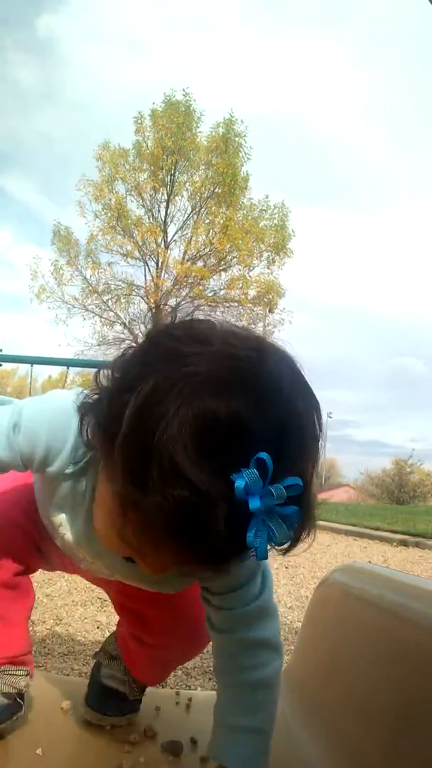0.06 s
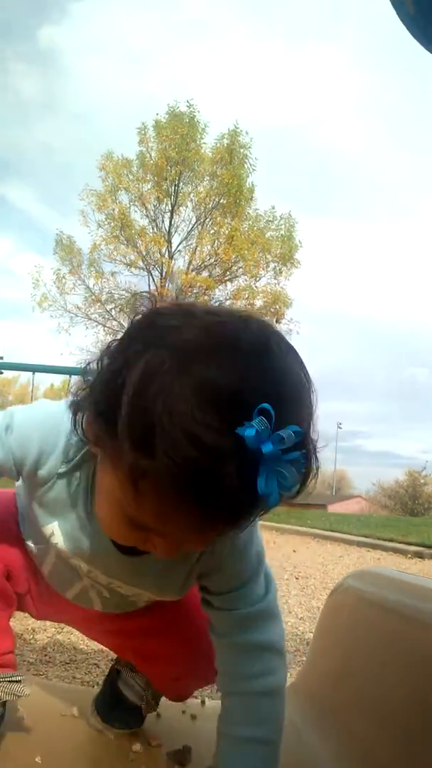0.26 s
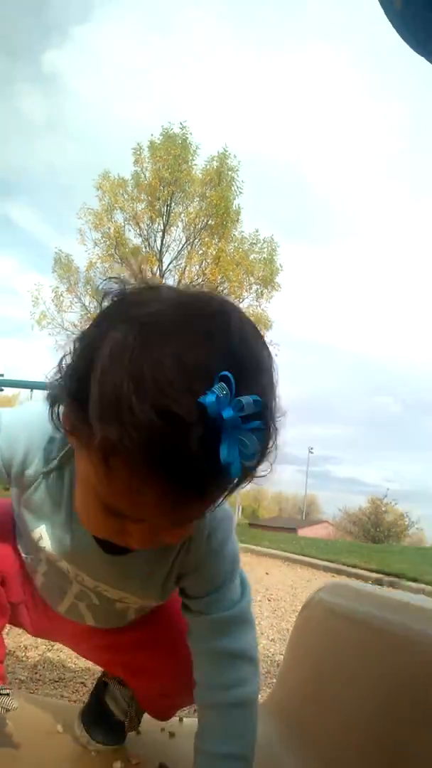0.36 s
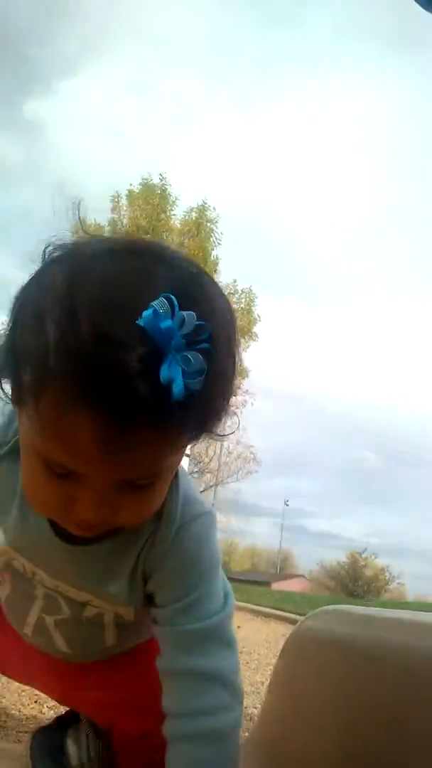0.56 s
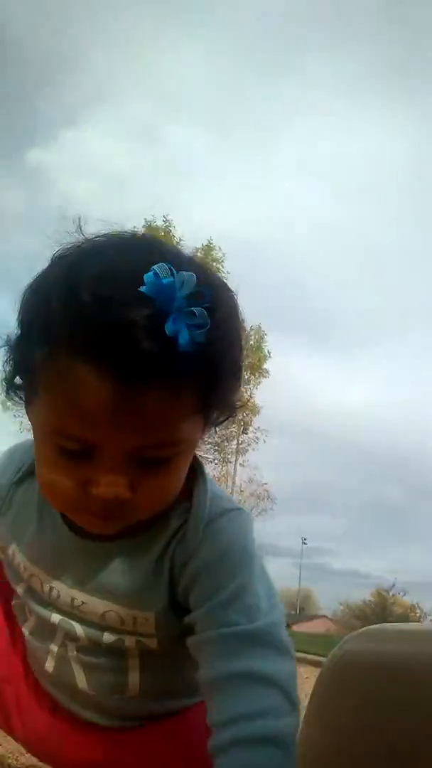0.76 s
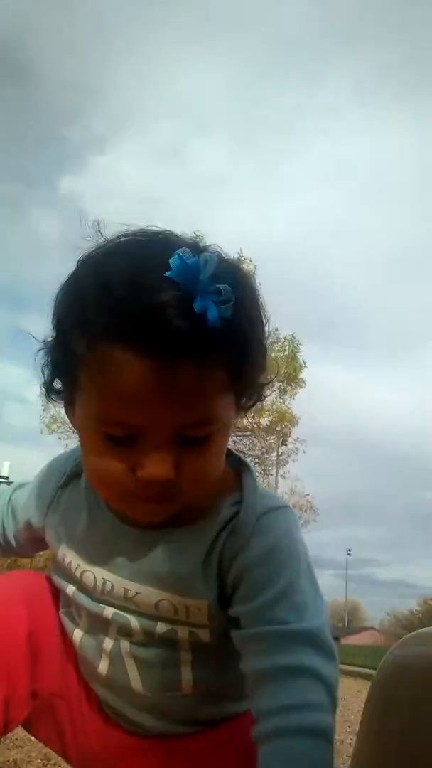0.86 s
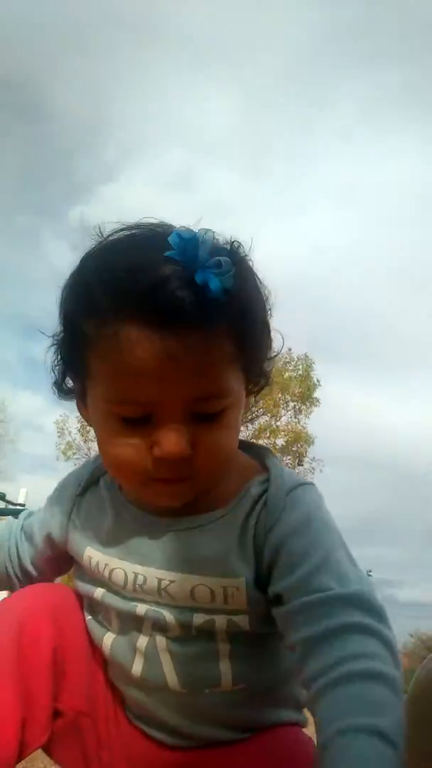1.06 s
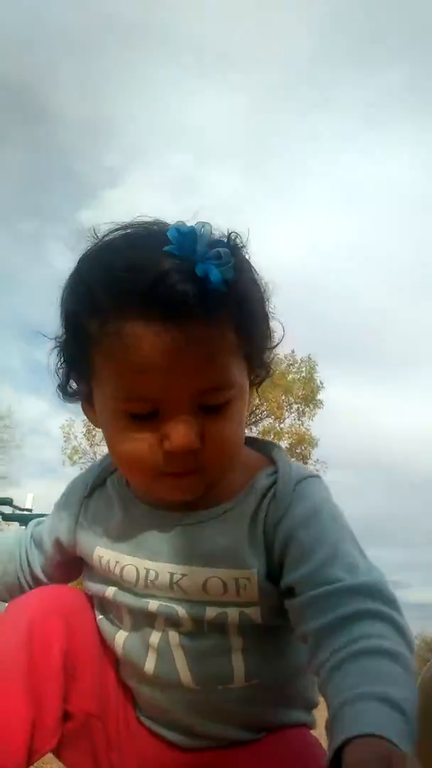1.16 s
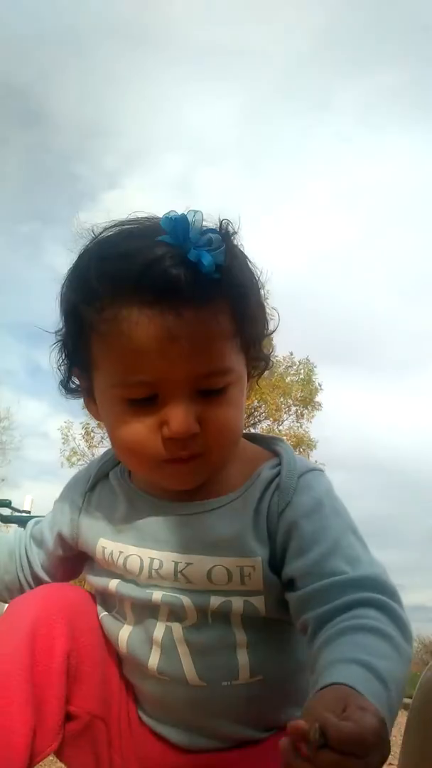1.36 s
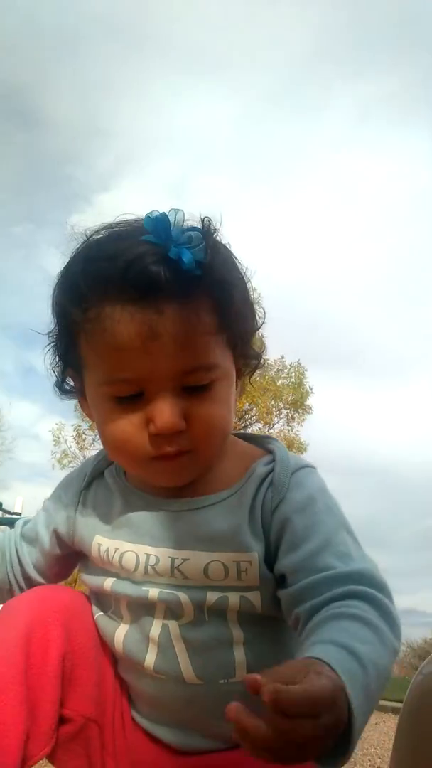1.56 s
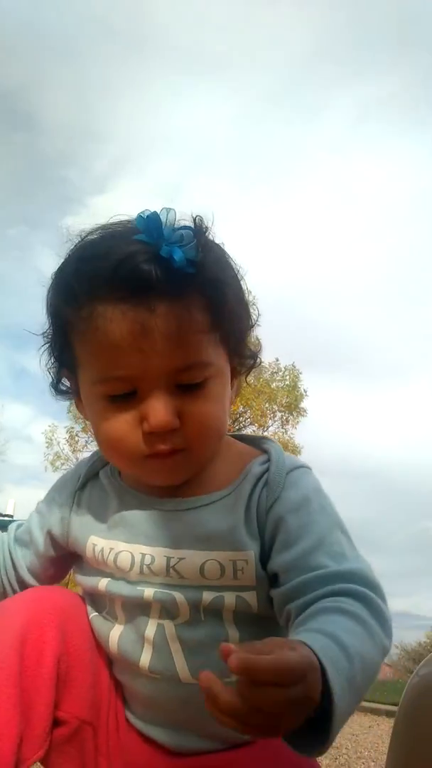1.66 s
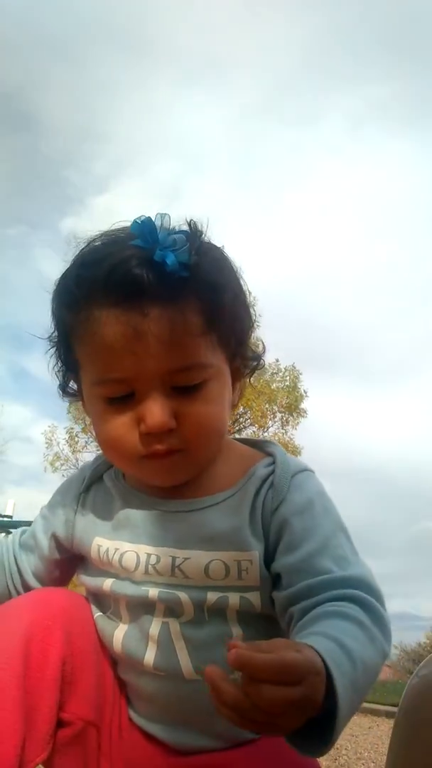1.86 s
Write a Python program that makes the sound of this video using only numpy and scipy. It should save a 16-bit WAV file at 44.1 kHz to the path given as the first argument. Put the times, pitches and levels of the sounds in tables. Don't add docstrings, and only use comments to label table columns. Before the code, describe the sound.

Small pebbles crunch, scrape and knock on a hollow plastic playground slide, then tick to rest

```python
import sys
import numpy as np
from scipy import signal
from scipy.fft import rfft, irfft
from scipy.io import wavfile

SR = 44100
rng = np.random.default_rng(int(sys.argv[2]) if len(sys.argv) > 2 else 0)


def wav_out(sig):
    wavfile.write(sys.argv[1], SR, np.round(np.clip(np.atleast_2d(sig).T, -1, 1) * 32767).astype(np.int16))


def volts(x):
    e = np.asarray(x, float) / 20
    return 10 ** e


N = 83790

# (time [s], shell level from its pressure [dB], grit level [dB], centre of the shell's ring [Hz])
HAND_DRAG = [(0, -44, -42, 465), (.12, -63, -47.5, 390), (.21, -36, -41, 328), (.27, -25.5, -32.5, 460),
             (.36, -18, -30, 575), (.52, -22.5, -34, 632), (.6, -22.5, -32, 440), (.8, -27.5, -36, 338),
             (.97, -31.5, -36, 354), (1.09, -41, -43.5, 340), (1.14, -49, -61.5, 292),
             (1.3, -67, -53.5, 288), (1.41, -66, -57, 250), (1.466, -68, -56, 250),
             (1.474, -34, -48.5, 270), (1.605, -33.5, -43, 274), (1.63, -42.5, -66, 302),
             (1.9, -74.5, -66, 300)]
# (time [s], peak level [dB], ring [Hz])
STONE_LURCHES = [(0.252, -14, 380), (0.261, -10, 420), (0.315, -13, 650), (0.353, -4, 577),
                 (0.368, -4.5, 565), (0.423, -10, 640), (0.428, -5, 700), (0.467, -11, 575),
                 (0.489, -6.5, 637), (0.51, -13, 600), (0.626, -17.5, 415), (0.689, -31, 386),
                 (0.707, -32, 455), (1.474, -20.5, 348), (1.497, -23, 306), (1.514, -32, 258),
                 (1.543, -21.5, 356), (1.567, -26, 308), (1.586, -28, 403), (0.541, -26, 564),
                 (0.959, -15, 335)]
# (frequency [Hz], level [dB])
GRIT_COLOUR = [(200, 26.5), (700, 18), (1600, 7), (2800, 8.5), (4200, -5.5), (7500, -0.5), (10500, -8),
               (16000, -26)]
# (frequency [Hz], width [Hz], level [dB])
GRIT_RESONANCES = [(3540, 550, 5.5), (5030, 1610, 11), (9200, 1350, 7.5), (11870, 2700, 17),
                   (14420, 2100, 23)]
# (time [s], peak level [dB], shell part [dB], bright part [dB])
HAND_CRACKS = [(0.015, -27.5, 1, 15.5), (0.0342, -26.5, 3.5, 12.5), (0.0595, -19.5, -6.5, 1),
               (0.0955, -29, 10, 14), (0.1125, -33, -8, 7), (0.137, -43, -10, 14), (0.3056, -9, -14, -17),
               (0.3318, -1.5, -26, -21), (0.3544, -10, 3, -12), (0.3708, -19, -12, -14),
               (0.4268, -11.5, 1.5, 6), (0.4414, -20, -9, 2), (0.4674, -22, -14, 9),
               (0.4894, -11.5, 6, 6.5), (0.5114, -16, 11, 9.5), (0.7082, -4.5, -5, -6),
               (0.7547, -15, -4, 9), (0.7619, -3.5, -10, 6), (0.785, -25.5, 10, 10), (0.8768, -3, -1, -10),
               (0.9246, -13.5, -5, 10.5), (0.9274, -3, -2, -6), (0.9332, -29, -6, 9),
               (0.9574, -10.5, -4, 7), (0.973, -14.5, -2, -22), (0.9872, -21, -1, 12),
               (0.9903, -14, -10.5, 16.5)]
# (time [s], peak level [dB], shell part [dB], bright part [dB])
LOOSE_TICKS = [(1.1477, -27, 0, -12), (1.1546, -23, -1.5, -24), (1.1766, -27, 2, -20),
               (1.1943, -21.5, -5, -1), (1.2008, -24.5, -1.5, 15.5), (1.2144, -28.5, -0.5, -8),
               (1.2488, -35, 5.5, 14.5), (1.2805, -53, -12, 16), (1.291, -53, -8.5, -1),
               (1.308, -43, -2, 8), (1.3274, -28, 1, 12.5), (1.3398, -27.5, -1.5, 0),
               (1.3535, -26.5, -4, 7), (1.3657, -35, -1.5, 2), (1.4166, -39.5, 5, 14.5),
               (1.4622, -42.5, -16, 19), (1.4985, -26.5, 9.5, 8), (1.5202, -36, 15, 7),
               (1.6604, -19, -7, 5), (1.6714, -52, -3.5, 5), (1.6812, -26, 6, 2), (1.6949, -33.5, -6, 3),
               (1.7304, -31, 10, 20.5), (1.7816, -31, 4, 26.5), (1.7982, -30, -4, 7), (1.8122, -45, 0, 13),
               (1.855, -40, -21, 10), (1.8658, -27, -1.5, 15), (1.8712, -33.5, -17, 17.5)]
# (time [s], peak level [dB], shell part [dB], bright part [dB])
LAST_BOUNCES = [
    (1.473, -45, 14, -4),
    (1.6168, -9.5, 6, 7),
    (1.6189, -9.5, 2.5, 21),
    (1.71, -36, -2, 3),
    (1.725, -39, -14, 11),
    (1.896, -55, -23, 6),
    (1.883, -42, -1, 28),
    (1.891, -46, -10, 24),
]
# (frequency [Hz], level [dB], time to fall 60 dB [s])
SHELL_MODES = [(420, -17, 0.06), (676, -10, 0.029), (963, -5, 0.0089), (1440, -6.5, 0.006),
               (1860, -3.5, 0.008), (2780, -14, 0.0029)]
# (frequency [Hz], level [dB], time to fall 60 dB [s])
STONE_MODES = [(3410, -2.5, 0.0063), (4360, -7, 0.0019), (5300, -1.5, 0.0023), (6800, -10.5, 0.0046)]
# (frequency [Hz], level [dB], time to fall 60 dB [s])
BRIGHT_MODES = [(7860, -11.5, 0.0081), (9310, -2.5, 0.0026), (10900, -10, 0.0033), (12260, -3.5, 0.0011),
                (15100, -8, 0.0021), (16000, -20, 0.001)]
# (start [s], end [s], from [Hz], to [Hz], level [dB])
SKID_SQUEAK = (1.415, 1.465, 11800, 14200, -52)
# (time [s], level [dB])
BREEZE_LEVEL = [(0, -64), (.2, -48), (.45, -46.5), (.62, -34.5), (.8, -45), (1.0, -42), (1.15, -53.5),
                (1.4, -53), (1.5, -48.5), (1.6, -42), (1.66, -69), (1.9, -63)]
# (time [s], level [dB])
HUM_LEVEL = [(0, -63), (.15, -50), (.4, -51), (1.05, -43), (1.3, -58), (1.6, -30), (1.65, -68), (1.9, -77)]
# (frequency [Hz], level [dB])
LEFT_COLOUR = [(30, 2.5), (200, -.8), (1200, .8), (7000, -.2), (13000, 2.2)]
# (frequency [Hz], width [Hz])
SUM_NOTCHES = [(2500, 300), (5350, 210), (7850, 260), (10300, 250), (12900, 230)]


def rms_one(x):
    return x / np.sqrt(np.mean(x ** 2) + 1e-20)


def in_time(rows):
    s, *columns = np.transpose(rows)
    return [np.interp(np.arange(N) / SR, s, c) for c in columns]


def at_hz(points, hz):
    table_hz, table_db = np.array(points).T
    return np.interp(np.log(hz), np.log(table_hz), table_db)


def drift(rate):
    r = np.exp(-40 * np.pi * rate / SR)
    noise = rng.standard_normal(N // 20 + 2002)
    slow = signal.lfilter([1], [1, -2 * r, r * r], noise)[2000:]
    return np.interp(np.arange(N) / 20, np.arange(len(slow)), rms_one(slow))


def ring(clicks, hz, t60):
    r = volts(-60 / (t60 * SR))
    w = 2 * np.pi * hz / SR
    return signal.lfilter([0, np.sin(w)], [1, -2 * r * np.cos(w), r * r], clicks + 1e-18)


def grains(per_s, spread_db):
    sizes = volts(spread_db * np.minimum(rng.exponential(1, N), 4.5))
    sizes = sizes * rng.choice([-1, 1], N)
    return sizes * (rng.random(N) < per_s / SR)


def shell_rumble(level_db, centre_hz, clump):
    width_octaves, skirt_db, clump_db, ring_cycles = 0.36, -16, 1.7, 17
    slips = grains(2500, 0.94)
    dealt = rng.integers(0, 24, N)
    pitches = np.geomspace(120, 2200, 24)
    octaves_away = np.log2(pitches[:, None] / centre_hz)
    weights = np.exp(-0.5 * (octaves_away / width_octaves) ** 2) + volts(skirt_db)
    weights = weights / np.sqrt(np.mean(weights ** 2, axis=0))
    weights = weights * volts(level_db + clump_db * clump)
    out = 0
    for k, hz in enumerate(pitches):
        mine = slips * (dealt == k)
        t60 = ring_cycles / hz
        out = out + ring(mine * weights[k], hz, t60) / ring(mine, hz, t60).std()
    out = signal.sosfilt(signal.butter(4, 170, "high", fs=SR, output="sos"), out)
    return volts(3.5) * out / np.sqrt(24)


def lurches():
    rise_s, cycles = 0.0014, 12.4
    out = np.zeros(N + 4000)
    t = np.arange(4000) / SR
    for s, db, hz in STONE_LURCHES:
        shape = (1 - np.exp(-t / rise_s)) * volts(-60 * t * hz / cycles)
        start = int(s * SR)
        out[start:start + len(t)] += volts(db + 5.5) * shape * np.sin(2 * np.pi * hz * t)
    return out[:N]


def grit(level_db, clump):
    grains_per_s, spread_db = 6000, 1.23
    own_db, own_from_hz = -4, 1800
    hz = np.fft.rfftfreq(N, 1 / SR) + 1
    resonances = sum(db / (1 + (2 * (hz - f) / w) ** 2) for f, w, db in GRIT_RESONANCES)
    colour = volts(at_hz(GRIT_COLOUR, hz) + resonances) * np.minimum(hz / 250, 1) ** 2
    common = grains(grains_per_s, spread_db)
    own = [grains(grains_per_s, spread_db) for port in (0, 1)]
    spectra = rfft(common) + volts(own_db) * rfft(own) * hz / np.hypot(hz, own_from_hz)
    clump_db = 1.39 + 1 * np.clip((-43 - level_db) / 10, 0, 1)
    return volts(10.5 + level_db + clump_db * clump) * rms_one(irfft(spectra * colour, N))


def pebbles():
    contact_s, after_s, after_db = 0.0006, 0.004, -15
    shell_lag_s, soft_s = 0.001, 0.00008
    hit_db, luck_db = -3.5, 1.5
    hits = list(HAND_CRACKS) + list(LOOSE_TICKS) + list(LAST_BOUNCES)
    s, db, shell_db, bright_db = np.transpose(hits)
    span = np.arange(900)
    t = span / SR
    modes = [(m, shell_db, True) for m in SHELL_MODES]
    modes += [(m, 0, False) for m in STONE_MODES]
    modes += [(m, bright_db, False) for m in BRIGHT_MODES]
    luck = rng.standard_normal((len(s), len(modes)))

    swell = t / contact_s * np.exp(1 - t / contact_s)
    trickle = volts(after_db) * np.minimum(t / contact_s, 1) * np.exp(-t / after_s)
    rough = rng.standard_normal((len(s), len(span))) * (swell + trickle)
    rough = rough / np.sqrt(np.sum(rough ** 2, axis=1, keepdims=True))
    late = np.maximum(t - shell_lag_s, 0)
    soft = late * np.exp(-late / soft_s)
    soft = soft / soft.sum() + 0.69 * rough

    at = (s * SR).astype(int)[:, None] + span
    out = 0
    for k, ((hz, mode_db, t60), part_db, in_shell) in enumerate(modes):
        push = np.zeros(N + len(span))
        contact = soft if in_shell else rough
        height = volts(db + part_db + mode_db + hit_db + luck_db * luck[:, k])
        np.add.at(push, at, contact * height[:, None])
        out = out + ring(push[:N], hz, t60)
    return signal.sosfilt(signal.butter(2, 280, "high", fs=SR, output="sos"), out)


def squeak():
    start, end, from_hz, to_hz, db = SKID_SQUEAK
    along = np.clip((np.arange(N) / SR - start) / (end - start), 0, 1)
    pitch_hz = from_hz + (to_hz - from_hz) * along + 60 * drift(150)
    phase = 2 * np.pi * np.cumsum(pitch_hz) / SR
    return volts(db) * np.sqrt(4 * along * (1 - along)) * np.sin(phase)


def breeze():
    level_db, = in_time(BREEZE_LEVEL)
    white = rng.standard_normal(N) + volts(2) * rng.standard_normal((2, N))
    low = signal.sosfilt(signal.butter(3, [78, 186], "band", fs=SR, output="sos"), white)
    air = volts(9.5 + level_db - 1.5 * drift(8)) * rms_one(low)
    deep = signal.sosfilt(signal.butter(1, [20, 70], "band", fs=SR, output="sos"), white)
    far = volts(-53 + 0.67 * (level_db + 52)) * rms_one(deep)
    hum_db = 2 + drift(4.3) + in_time(HUM_LEVEL)[0]
    hum = volts(hum_db) * np.sin(2 * np.pi * np.cumsum(70 + drift(3.3)) / SR)
    return air + hum + far


def scene():
    shell_db, grit_db, centre_hz = in_time(HAND_DRAG)
    clump = drift(24.3)
    rumble = shell_rumble(shell_db, np.clip(centre_hz, 100, 2000), clump)
    near = rumble + lurches() + pebbles() + squeak()
    return near + grit(grit_db, clump + 0.5 * drift(80)) + breeze()


def band_limit(x):
    return signal.sosfilt(signal.butter(12, 16450, fs=SR, output="sos"), x)


def record(dry):
    late_s, left_db, limit = 17.3 / 44100, -3.8, 1.05
    hz = np.fft.rfftfreq(N, 1 / SR) + 1e-3
    delay = np.exp(-2j * np.pi * hz * late_s)
    left = irfft(-volts(left_db + at_hz(LEFT_COLOUR, hz)) * delay * rfft(dry[0]), N)
    right = dry[1]

    hz, s, frames = signal.stft((left + right) / 2, SR, nperseg=1024)
    at = np.minimum(s * SR, N - 1).astype(int)
    power = np.sum(np.abs(frames[hz > 3000]) ** 2, axis=0) + 1e-12
    steady = np.minimum(1.8 * signal.medfilt(power, 9) / power + 1e-3, 1) ** 1.5
    for notch_hz, width_hz in SUM_NOTCHES:
        centre = notch_hz + 70 * drift(10)[at]
        width = steady * width_hz * volts(3.5 * drift(14)[at])
        apart = ((hz[:, None] - centre) / width) ** 8
        frames = frames * apart / (1 + apart)
    frames = frames / (1 + (hz[:, None] / 15000) ** 80)
    mid = signal.istft(frames, SR)[1][:N]

    side = (left - right) / 2
    both = np.clip(mid + side * np.array([[1], [-1]]), -limit, limit)
    both = signal.sosfilt(signal.cheby2(10, 50, 15950 + 600, fs=SR, output="sos"), both)
    return band_limit(np.clip(both, -1, 1))


dry = scene()
out = record(dry)
wav_out(out)
```